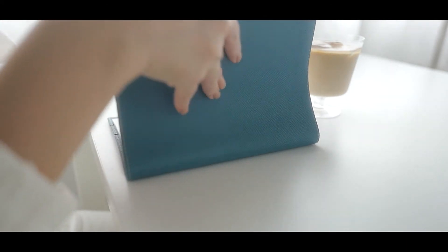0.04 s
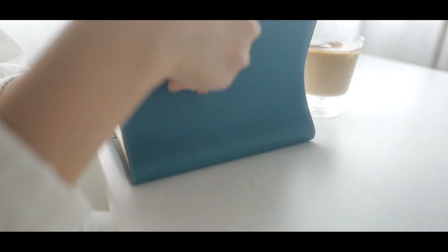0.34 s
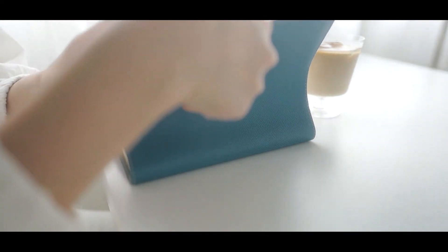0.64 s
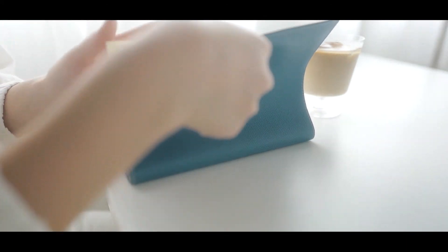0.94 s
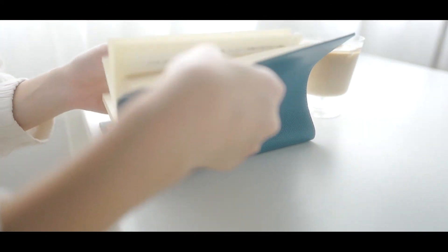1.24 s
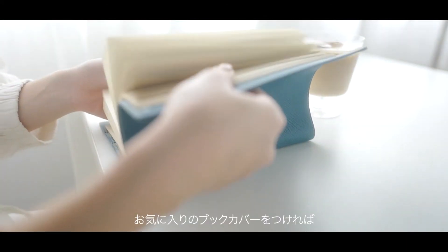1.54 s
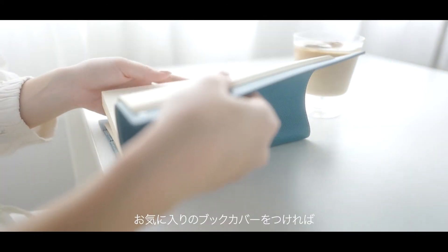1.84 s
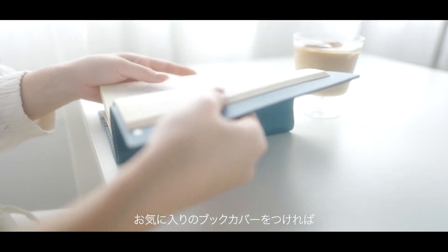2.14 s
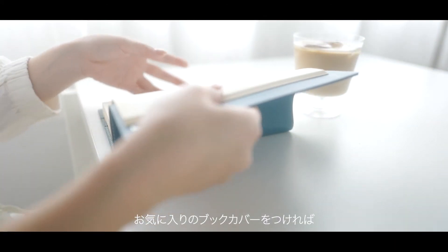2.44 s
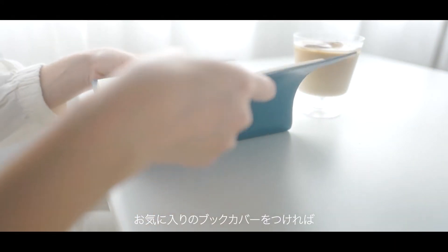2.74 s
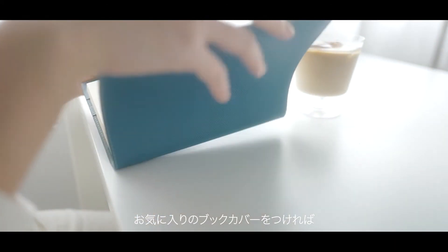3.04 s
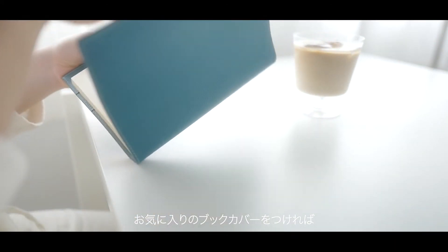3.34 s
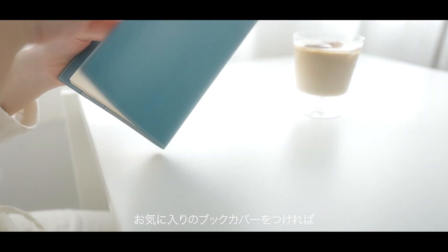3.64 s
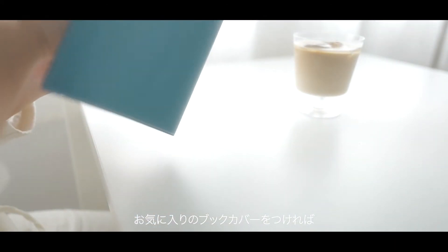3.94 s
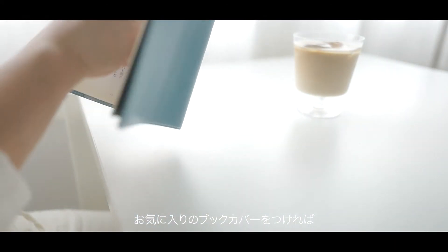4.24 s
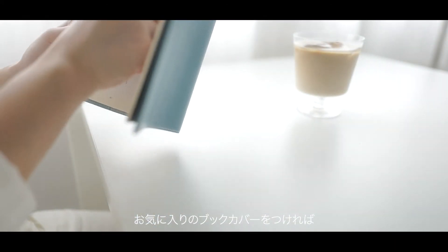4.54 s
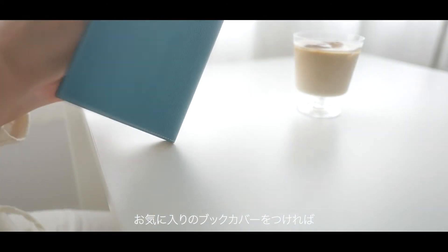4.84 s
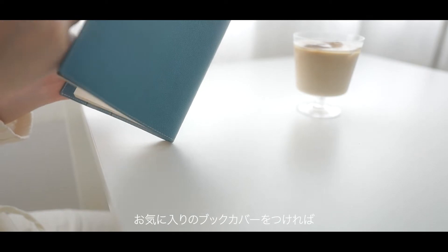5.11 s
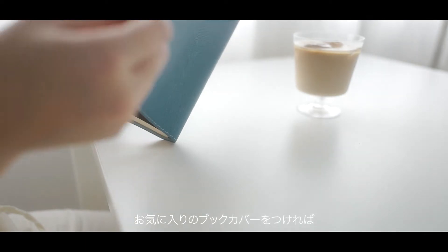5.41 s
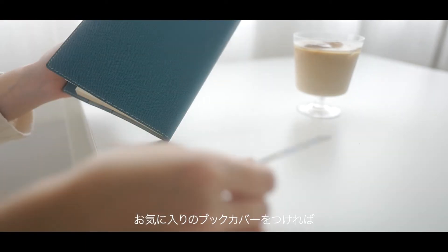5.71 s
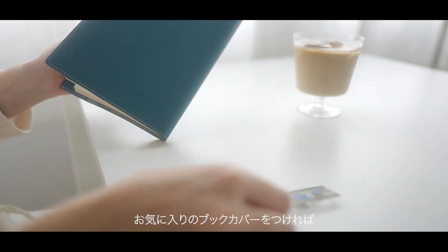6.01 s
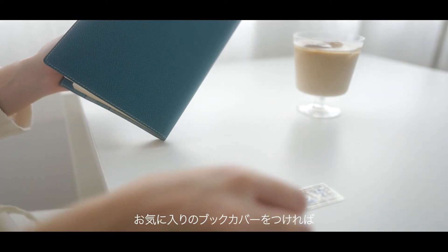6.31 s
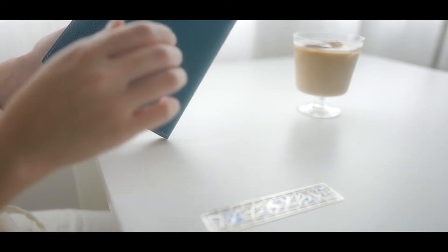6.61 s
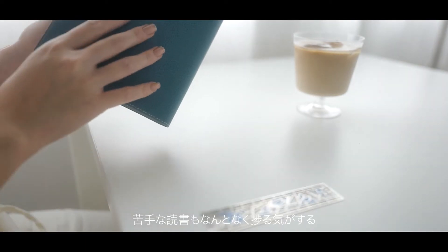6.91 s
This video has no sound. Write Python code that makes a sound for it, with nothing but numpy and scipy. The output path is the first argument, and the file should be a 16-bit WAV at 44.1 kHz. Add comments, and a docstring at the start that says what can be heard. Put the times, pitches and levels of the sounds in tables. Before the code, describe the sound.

A fan hums quietly and steadily in a small room, heard through close microphones in narrow stereo. From the start, hands rub a leather book cover softly, and a fingertip brushes paper. From about 1.1 seconds page edges flick in a quick, growing run, ending at 1.8 seconds with a loud, dry snap as a stiff board slips into place. Between 2.6 and 4 seconds leather and paper slide and creak, with light taps and soft, hollow knocks as the book is closed. A short, grainy scrape over the page edges comes at 4.7 seconds, among faint leather ticks, then a soft bump at 5.3. A thin, stiff bookmark clicks at about 5.9 and 6 seconds, skids slightly, and lands on the table with a sharp clack at 6.3, ringing briefly after each touch. The fan and faint rubbing continue to about 7 seconds.

```python
"""First comes the soft rub of leather over the hum of a fan in a small room: a book is being worked
into a leather cover on a table. Leather and paper catch and slip, so they rasp, creak and tick.
A stiff board snaps into place, and the book knocks softly as it is closed. Then a thin, stiff
bookmark clicks twice and is laid on the table with a sharp clack, ringing briefly after each touch."""
import sys
import numpy as np
from scipy import signal
from scipy.fft import rfft, irfft
from scipy.io import wavfile

SR = 44100
rng = np.random.default_rng(int(sys.argv[2]) if len(sys.argv) > 2 else 0)


def master_out(mix):
    """Clip the mix to full scale and print it as 16-bit PCM to the path in sys.argv[1]."""
    frames = np.transpose(np.atleast_2d(mix))
    ceiling = np.clip(frames, -1, 1)
    pcm = np.round(ceiling * 32767).astype(np.int16)
    wavfile.write(sys.argv[1], SR, pcm)


N = 316020

# how long the room's echo takes to fade by 60 dB: (frequency [Hz], fade time [s])
ROOM_FADE = [(800, .38), (2000, .32), (3200, .36), (5500, .34), (9000, .28), (15000, .22)]
# tone colour of the fan's rushing air: (frequency [Hz], level [dB])
FAN_COLOUR = [(30, -32), (70, -33), (100, -15.5), (130, -16), (170, -1), (240, 2.5), (320, -2.5), (400, -7),
              (490, -23), (620, -10.5), (760, -10.5), (950, -12.5), (1130, -8.5), (1500, -18),
              (2200, -21.5), (3200, -28.5), (10000, -31.5), (16000, -39.5)]
# the fan's humming notes: (frequency [Hz], level [dB])
FAN_NOTES = [(236, -66), (259, -63), (737, -65.5), (1130, -61.5), (1346, -75.5)]

# hand and pages sliding over the cover:
# (start [s], length [s], leather level [dB], paper level [dB], paper's top octave over the rest [dB])
SLIDES = [(0, .33, -64, -67, 4), (.48, 0.12, -67, -65, 1), (0.57, .045, -60.5, -59, 7),
          (.825, .04, -67, -65.5, 14), (0.895, 0.21, -64, -60.5, 6), (1.133, 1, -72, -72, 12),
          (1.424, .09, -60, -62, 0), (1.54, 0.19, -53, -53.5, -1), (1.904, .35, -59, -60.5, -11.5),
          (2.206, .044, -70, -53.5, 3), (2.587, 0.087, -60, -58.5, -2), (2.741, 0.083, -58, -60.5, 1),
          (2.842, 0.12, -53.5, -60, -4), (3.295, .24, -56.5, -61, -3.5), (3.548, 0.12, -50, -55.5, -6),
          (3.68, 0.26, -58.5, -55, .5), (3.919, 0.043, -45, -56.5, -6), (4.019, 0.079, -53.5, -70, -15),
          (4.155, .085, -60, -64, -10), (4.597, 0.35, -64, -61, -1), (4.69, 0.04, -55.5, -55.5, -11),
          (4.722, 0.064, -58, -46.5, 2.5), (4.964, 0.27, -78, -68, -2), (6.884, .031, -72, -73, 18)]
# tone colour of rubbed leather: (frequency [Hz], level [dB])
LEATHER_COLOUR = [(150, -30), (450, -19.5), (750, 0), (1100, 3.5), (1650, 2), (2300, -1.5), (3000, -8),
                  (5500, -59)]
# tone colour of sliding paper: (frequency [Hz], level [dB])
PAPER_COLOUR = [(600, -22.5), (2200, -0.5), (3400, -1.5), (5500, -2.5), (7800, -8.5), (9800, -5.5),
                (12000, -9.5), (16000, -13)]
# a fingertip brushing the page edges: (start [s], length [s], level [dB], pitch [factor])
BRUSHES = [(.19, .04, -61, 1.2), (.974, .026, -49.5, 1.04), (1.02, .06, -54, .98)]
# bands of that brushing, before the pitch factor: (centre [Hz], width [Hz], level [dB])
FINGERTIP_BANDS = [(2200, 490, 6), (6200, 1300, 1), (9700, 1600, -7)]
# leather creaking as it bends: (start [s], length [s], level [dB], first pitch [Hz], last pitch [Hz])
LEATHER_CREAKS = [(2.597, .04, -47.5, 2100, 2250), (3.555, .024, -46.5, 2200, 2100),
                  (3.625, .042, -48.5, 1600, 2400)]
# the cover's flap scraping over the page edges: (start [s], length [s], level [dB])
FLAP_SCRAPES = [(4.739, .015, -42.5), (4.78, .026, -48)]
# bands of that scraping: (centre [Hz], width [Hz], level [dB])
FLAP_BANDS = [(3260, 490, -2), (4300, 900, -2), (5600, 2000, -7), (7500, 2600, -8), (9800, 1200, -6)]
# the loudest page edges flicking past one another: (time [s], level [dB])
PAGE_FLICKS = [(.893, -52.5), (1.1412, -55), (1.1587, -46), (1.1986, -47.5), (1.2315, -51), (1.2624, -55),
               (1.3043, -49), (1.3363, -54), (1.3617, -48.5), (1.4041, -51), (1.4241, -50), (1.457, -50.5),
               (1.462, -49.5), (1.4839, -52.5), (1.5014, -45), (1.5413, -48), (1.549, -48.5), (1.5722, -49),
               (1.578, -46.5), (1.6271, -46), (1.664, -48), (1.677, -47.5), (1.6996, -41), (1.789, -42)]
# tone colour of a flick: (frequency [Hz], level [dB])
FLICK_COLOUR = [(400, -14), (1500, -4), (3800, 1), (6000, 1), (8000, -3), (10000, -2), (16000, -13)]
# leather ticking as it flexes: (time [s], level [dB])
LEATHER_TICKS = [(3.69, -49), (4.362, -52.5), (4.4892, -54), (4.5204, -54.5), (5.1342, -57), (5.218, -53.5),
                 (5.3764, -55.5)]
# tone colour of a tick: (frequency [Hz], level [dB])
TICK_COLOUR = [(400, -8), (2200, 5), (3100, -2), (4300, 0), (10000, -8), (16000, -16)]

# two last page flicks with a short note, then book and cover knocking on hand and table:
# (time [s], click level [dB], brightness [dB per octave], note [Hz], note level [dB])
TAPS = [(1.701, -44, -2, 1450, -41), (1.759, -46, 0, 2500, -48), (1.7805, -36, -1, 1330, -35),
        (2.634, -40.5, 4, 2260, -29.5), (2.8495, -35, -1.2, 2330, -33.5), (3.312, -40, -.5, 930, -29),
        (3.329, -49, -2, 900, -37), (3.538, -52, 0, 2350, -42.5), (3.7665, -39.5, -2.5, 860, -30.5),
        (3.784, -42, -.5, 2330, -33), (3.895, -35, -2.5, 1200, -28), (3.919, -41.5, 0, 1600, -39),
        (3.939, -36.5, -1.5, 1400, -33.5)]
# tone colour of those taps: (frequency [Hz], level [dB])
TAP_COLOUR = [(200, -18), (500, -12), (750, -2), (1400, 0), (2200, -1), (3000, -8), (4300, -6), (8000, -18),
              (16000, -29)]
# close notes of a tapped spot: (pitch [ratio to the tap's note], level [dB])
SPOT_NOTES = [(.86, -10), (1, 0), (1.14, -9)]
# dull thumps of the book, the first as it closes just before the board snaps: # (time [s], thud level [dB],
# hollow note [Hz], note level [dB])
BOOK_THUMPS = [(1.781, -43, 300, -46), (2.635, -50, 285, -36), (3.767, -47, 300, -48),
               (3.8955, -35, 330, -31), (4.8, -54, 125, -46), (5.333, -40.5, 340, -43)]
# tone colour of a thud: (frequency [Hz], level [dB])
THUD_COLOUR = [(60, -28), (150, -16), (300, 7.5), (400, 4.5), (550, -3.5), (800, 5), (1400, -53.5)]
# the board snapping home and rattling: (time [s], level [dB])
BOARD_SNAPS = [(1.8024, -20.3), (1.805, -34.5), (1.8121, -35), (1.819, -38)]
# tone colour of a snap: (frequency [Hz], level [dB])
SNAP_COLOUR = [(100, -15), (300, -4), (500, -7), (800, -1), (1900, -2), (2600, -9), (3400, -1), (4200, 2),
               (7500, -3.5), (11000, -5), (16000, -16)]
# the book's hollow notes after the snap: (frequency [Hz], level [dB], fade time [s])
HOLLOW_NOTES = [(350, -40, .05), (612, -37.5, .12), (781, -35, .12), (1080, -40, .17), (1507, -40, .17)]

# the bookmark's edge skidding on the table: (start [s], length [s], level [dB])
EDGE_SKIDS = [(6.055, .04, -63), (6.108, .02, -51.5)]
# notes that sing in a skid: (frequency [Hz], level [dB])
SINGING_NOTES = [(2557, -5), (2792, -3), (3095, 0)]
# the bookmark touching down:
# (time [s], level [dB], brightness [dB per octave], edge note [Hz], note level [dB])
TOUCHES = [(5.8758, -45.7, 1.5, 2600, -42), (6.0425, -39.5, 1.7, 2520, -37.5),
           (6.2856, -22.7, 0, 3150, -28)]
# tone colour of a touch: (frequency [Hz], level [dB])
TOUCH_COLOUR = [(100, -20), (340, -3), (500, -16), (650, -7.5), (900, -7), (1350, 3), (1650, 4), (2050, 4),
                (2650, -7), (3200, 3), (3900, -1.5), (5200, 1), (7500, -1.5), (10500, 0), (12500, -4),
                (13800, 2.5), (16000, -7)]
# quick bounces within each touch: (delay [s], added level [dB], added brightness [dB per octave])
BOUNCES = [(0, 0, .5), (.0017, -1, -1.5), (.0032, -2, 0), (.0105, -6, .5)]
# the bookmark's own ringing notes: (frequency [Hz], level [dB])
BOOKMARK_NOTES = [(1421, -4), (1751, 1), (1986, -1), (2540, -8), (3058, 0), (3095, -1), (3444, -7),
                  (4802, -5), (4997, -4), (5430, -7), (8084, -6), (8950, -6), (9868, -7), (10644, -7),
                  (13350, -7), (13584, -4), (13950, -6)]
# how long those notes take to fade by 60 dB: (frequency [Hz], fade time [s])
BOOKMARK_FADE = [(3000, .25), (14000, .19)]

# how far the left microphone leads the right: (frequency [Hz], phase [radians])
MIC_LEAD = [(100, 0), (300, .15), (600, .7), (1200, .95), (2500, .55), (5000, .22), (10000, .06)]
# how much louder the left microphone is than the right: (frequency [Hz], level [dB])
MIC_BALANCE = [(100, -2), (300, -2), (550, -4), (900, -8.5), (1500, -1.5), (4000, 2), (14000, 0)]
# stereo width, as the gain of the left-minus-right signal: (frequency [Hz], gain [dB])
MIC_WIDTH = [(40, 4), (130, -21.5), (300, -33), (600, -14), (2000, -2), (14000, -6)]


def amp(db):
    """Turns decibels into a gain."""
    return 10 ** (np.asarray(db) / 20)


def unit(x):
    """Scales a signal to an average strength (rms) of 1."""
    return x / np.sqrt(np.mean(x ** 2) + 1e-20)


def read(points, hz):
    """Reads between the rows of a table, on a log-frequency axis."""
    f, value = np.transpose(points)
    return np.interp(np.log(hz + 1), np.log(f + 1), value)


def add(mix, s, sound):
    """Mixes a sound in at s seconds."""
    part = mix[max(0, round(s * SR)):][:len(sound)]
    part += sound[:len(part)]


def shaped(x, colour):
    """Gives a long signal a tone colour, at rms 1."""
    return unit(irfft(rfft(x) * amp(read(colour, np.fft.rfftfreq(N, 1 / SR))), N))


def resonances(x, bands):
    """Passes friction through a few broad ringing bands, at rms 1."""
    hz = np.fft.rfftfreq(N, 1 / SR)
    body = sum(amp(db) / (1 + (2 * (hz - centre) / width) ** 2) for centre, width, db in bands)
    return unit(irfft(rfft(x) * body, N))


def gliding(x, hz, width_hz):
    """Passes a signal through one ringing band that follows the pitch curve hz, at rms 1."""
    turn = np.exp(2j * np.pi * np.cumsum(hz) / SR)
    r = np.exp(-np.pi * width_hz / SR)
    return unit((turn * signal.lfilter([1], [1, -2 * r, r * r], x / turn)).real)


def drift(rate_hz):
    """A random wobble of rms 1: chance values joined by straight lines."""
    values = rng.standard_normal(4096)
    return unit(np.interp(2 * rate_hz * np.arange(N) / SR, np.arange(len(values)), values))


def wavering(notes, wobble_db, level_rate_hz, phase_rate_hz):
    """Held notes that each wobble in loudness and pitch."""
    t, out = np.arange(N) / SR, np.zeros(N)
    for hz, db in notes:
        level = amp(db + wobble_db * drift(level_rate_hz))
        out += level * np.sin(2 * np.pi * hz * t + .7 * drift(phase_rate_hz))
    return out


def fade(t, fade_s):
    """A gain that falls by 60 dB every fade_s seconds."""
    return np.exp(-np.log(1000) * t / fade_s)


def ring(hz, fade_s, rise_cycles=.38):
    """One struck note that builds up within a cycle or so and dies away."""
    t = np.arange(SR // 2) / SR
    rise = 1 - np.exp(-(t * hz / rise_cycles) ** 2)
    return rise * fade(t, fade_s) * np.sin(2 * np.pi * hz * t)


def sized(x):
    """Gives a hit the energy of 4 ms at rms 1."""
    return x * np.sqrt(.004 * SR / np.sum(x ** 2))


def hit(colour, scuff_s, scuff, tilt=0, note_hz=1000, note_db=0, size=4096):
    """A sharp push and a short scuff of noise, given a tone colour and, if asked, one boosted note."""
    hz, t = np.fft.rfftfreq(size, 1 / SR), np.arange(size) / SR
    gain_db = read(colour, hz) + tilt * np.log2(np.maximum(hz, 500) / 2000)
    gain_db += note_db / (1 + ((hz / note_hz - 1) / .13) ** 2)
    gain_db -= 30 / (1 + (hz / 85) ** 4)  # small things give off no deep bass
    log_gain = np.log(amp(gain_db))
    mirrored = np.r_[log_gain, log_gain[-2:0:-1]]
    response = np.exp(np.conj(signal.hilbert(mirrored)))[:len(hz)]  # nothing sounds before the push
    force = rng.standard_normal(size) * fade(t, scuff_s)
    force *= scuff / np.linalg.norm(force)
    force[0] += 1  # the push
    return sized(irfft(rfft(force) * response))


def friction(per_s, spread_db, hiss):
    """Surfaces catch and let go: random slips of uneven size over a smooth hiss."""
    size = amp(spread_db * np.minimum(rng.exponential(1, N), 4))
    slips = size * rng.choice([-1, 1], N) * (rng.random(N) < per_s / SR)
    return unit(unit(slips) + hiss * rng.standard_normal(N))


def stroke(start, length, change_db=-2, let_go_s=.017):
    """Loudness of one slide: it eases in, changes by change_db on the way and dies once let go."""
    t = np.arange(N) / SR - start
    attack = .5 + .5 * np.tanh(2 * t / (.0084 + .2 * length))  # longer slides start more gently
    hold = amp(change_db * (np.clip(t / length, 0, 1) - .5))
    release = np.exp(-np.clip((t - length) / let_go_s, 0, 20))
    return attack * hold * release


def room(x, echo_db, left_db):
    """The direct sound, placed left or right, plus a wash of echo whose treble dies first."""
    hz, t, noise = signal.stft(rng.standard_normal((2, SR // 2)), SR, nperseg=256)
    tail = signal.istft(noise * fade(t, read(ROOM_FADE, hz)[:, None]), SR, nperseg=256)[1]
    tail *= 1 - np.exp(-(np.arange(tail.shape[1]) / SR / .0054) ** 2)  # echoes take a moment to arrive
    echo = signal.fftconvolve(x[None], tail / np.linalg.norm(tail[0]), axes=1)[:, :N]
    return x * amp([[left_db / 2], [-left_db / 2]]) + amp(echo_db) * echo


def fan():
    """A steady rush of air with a few slightly wavering notes."""
    air = amp(-48.5) * shaped(rng.standard_normal((2, N)), FAN_COLOUR)
    hum = wavering(FAN_NOTES, wobble_db=1.5, level_rate_hz=8, phase_rate_hz=6)
    return air + np.sqrt(2) * hum


def rubbing(holding_db=-63, split_hz=7500):
    """Leather rasps and paper hisses under an unsteady hand."""
    leather_power, low_power, top_power = np.zeros((3, N))
    for start, length, leather_db, paper_db, lift_db in SLIDES:
        power = stroke(start, length) ** 2
        leather_power += power * amp(leather_db) ** 2
        low_power += power * amp(paper_db - lift_db / 2) ** 2
        top_power += power * amp(paper_db + lift_db / 2) ** 2
    leather_power += amp(holding_db) ** 2  # held leather rubs faintly all the time
    grip_db = 1.66 * drift(rate_hz=20)
    leather = shaped(friction(per_s=1400, spread_db=3, hiss=1), LEATHER_COLOUR)
    paper = shaped(friction(per_s=2600, spread_db=2, hiss=.91), PAPER_COLOUR)
    low = signal.sosfiltfilt(signal.butter(2, split_hz, fs=SR, output="sos"), paper)
    paper_slide = np.sqrt(low_power) * low + np.sqrt(top_power) * (paper - low)
    return amp(grip_db) * (np.sqrt(leather_power) * leather + paper_slide)


def brushing():
    """A fingertip drags over the page edges, each brush at its own pitch."""
    out, slips = np.zeros(N), friction(per_s=1400, spread_db=4, hiss=.83)
    for start, length, db, pitch in BRUSHES:
        bands = [(hz * pitch, width, band_db) for hz, width, band_db in FINGERTIP_BANDS]
        out += amp(db) * stroke(start, length, let_go_s=.0075) * resonances(slips, bands)
    return out


def creaking():
    """Bent leather slips in small jerks that ring briefly, at a pitch that follows the bend."""
    t, out = np.arange(N) / SR, np.zeros(N)
    slips = friction(per_s=420, spread_db=6.5, hiss=.59)
    for start, length, db, first_hz, last_hz in LEATHER_CREAKS:
        hz = np.interp(t, [start, start + length], [first_hz, last_hz])
        out += amp(db) * stroke(start, length, let_go_s=.0045) * gliding(slips, hz, width_hz=850)
    return out


def scraping():
    """The flap catches on one page edge after another: a short, grainy rasp."""
    level = sum(amp(db) * stroke(start, length, let_go_s=.007) for start, length, db in FLAP_SCRAPES)
    return level * resonances(friction(per_s=1200, spread_db=3, hiss=.4), FLAP_BANDS)


def fanning_pages():
    """Page edges catch on one another and let go with tiny snaps, in one run that grows louder."""
    level = amp(-59.5) * stroke(start=1.15, length=.56, change_db=7, let_go_s=.03)
    catches = friction(per_s=110, spread_db=3, hiss=0)
    flick = hit(FLICK_COLOUR, scuff_s=.012, scuff=3)
    return level * unit(signal.oaconvolve(catches, flick)[:N])


def flicks_and_ticks():
    """Bent pages flick free, each with its own note, and the leather ticks as it flexes."""
    out = np.zeros(N)
    for s, db in PAGE_FLICKS:
        note_hz = rng.uniform(3500, 9000)
        add(out, s, amp(db) * hit(FLICK_COLOUR, scuff_s=.014, scuff=2.5, note_hz=note_hz, note_db=6))
    for s, db in LEATHER_TICKS:
        add(out, s, amp(db) * hit(TICK_COLOUR, scuff_s=.03, scuff=3))
    return out


def taps_and_bumps():
    """Two last page flicks, then the book's knocks, click and ring briefly; the book thumps hollowly."""
    out = np.zeros(N)
    for s, db, tilt, note_hz, note_db in TAPS:
        add(out, s, amp(db) * hit(TAP_COLOUR, scuff_s=.03, scuff=3.5, tilt=tilt))
        for ratio, spot_db in SPOT_NOTES:
            add(out, s, amp(note_db + spot_db) * ring(note_hz * ratio, fade_s=.028))
    for s, db, note_hz, note_db in BOOK_THUMPS:
        add(out, s, amp(db) * hit(THUD_COLOUR, scuff_s=.021, scuff=2.9))
        add(out, s, amp(note_db) * ring(note_hz, fade_s=.082, rise_cycles=1))
    return out


def board_snap():
    """The stiff board lets go with one dry crack, and the book under it sounds hollow."""
    out = np.zeros(N)
    for s, db in BOARD_SNAPS:
        add(out, s, amp(db) * hit(SNAP_COLOUR, scuff_s=.004, scuff=.9, note_hz=5200, note_db=3))
    for hz, db, fade_s in HOLLOW_NOTES:
        add(out, BOARD_SNAPS[0][0], amp(db) * ring(hz, fade_s))
    return out


def bookmark_skid():
    """The sliding edge sets a few rough, wavering notes singing."""
    level = sum(amp(db) * stroke(start, length, let_go_s=.035) for start, length, db in EDGE_SKIDS)
    return level * wavering(SINGING_NOTES, wobble_db=2.5, level_rate_hz=70, phase_rate_hz=70)


def bookmark_ring():
    """The thin bookmark rings with many high notes after each touch."""
    out, t = np.zeros(N), np.arange(SR // 2) / SR
    hz, note_db = np.transpose(BOOKMARK_NOTES)[:, :, None]
    dying = fade(t, read(BOOKMARK_FADE, hz))
    for s, db, tilt, _, _ in TOUCHES:
        level = amp(note_db + tilt * np.log2(hz / hz[0])) * dying
        notes = level * np.sin(2 * np.pi * (hz * t + rng.random(hz.shape)))
        add(out, s, amp(db) * sized(notes.sum(0)))
    return out


def bookmark_clicks(left_db=-1.5):
    """Each touch is a burst of hard clicks from different spots, with a woody note from the edge."""
    out, edge = np.zeros((2, N)), np.zeros(N)
    for delay, bounce_db, bounce_tilt in BOUNCES:
        spot = np.zeros(N)
        for s, db, tilt, _, _ in TOUCHES:
            click = hit(TOUCH_COLOUR, scuff_s=.016, scuff=2.2, tilt=tilt + bounce_tilt)
            add(spot, s + delay, amp(db + bounce_db) * click)
        out += room(spot, echo_db=3, left_db=left_db)  # each spot has its own echo
    for s, _, _, note_hz, note_db in TOUCHES:
        add(edge, s + .002, amp(note_db) * ring(note_hz, fade_s=.03))
    return out + room(edge, echo_db=0, left_db=left_db)


def scene():
    """Hands and book a little to the left, the bookmark's clicks to the right, the fan all round."""
    snap = room(board_snap(), echo_db=-6.2, left_db=1.2)
    handling = rubbing() + brushing() + creaking() + scraping() + fanning_pages()
    hands = room(handling, echo_db=-3.5, left_db=2.5)
    taps = room(flicks_and_ticks() + taps_and_bumps(), echo_db=-4.5, left_db=2.5)
    bookmark = bookmark_clicks() + amp(-4.5) * bookmark_ring() + bookmark_skid()
    return hands + taps + snap + bookmark + fan()


def record(dry):
    """Two close microphones: narrow stereo, the left leading in the midrange, the top treble cut off."""
    hz = np.fft.rfftfreq(N, 1 / SR)
    left, right = rfft(dry)
    mid = (left + right) / 2
    side = (left - right) / 2 * amp(read(MIC_WIDTH, hz))
    lean = amp(read(MIC_BALANCE, hz) / 2) * np.exp(1j * read(MIC_LEAD, hz) / 2)
    pair = irfft(np.array([(mid + side) * lean, (mid - side) / lean]), N)
    treble_cut = signal.firwin(511, cutoff=16000, window=("kaiser", 9), fs=SR)
    return signal.oaconvolve(pair, treble_cut[None], "same")


dry = scene()
out = record(dry)
master_out(out)
```